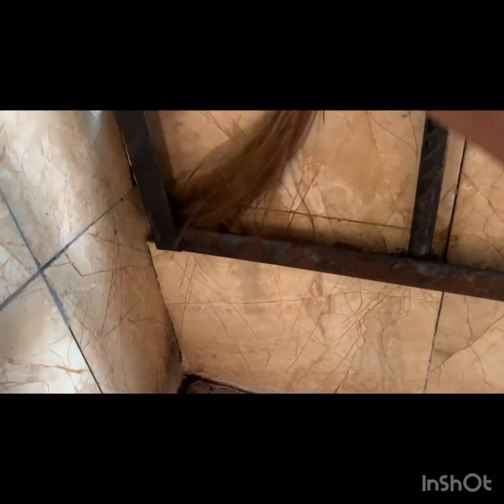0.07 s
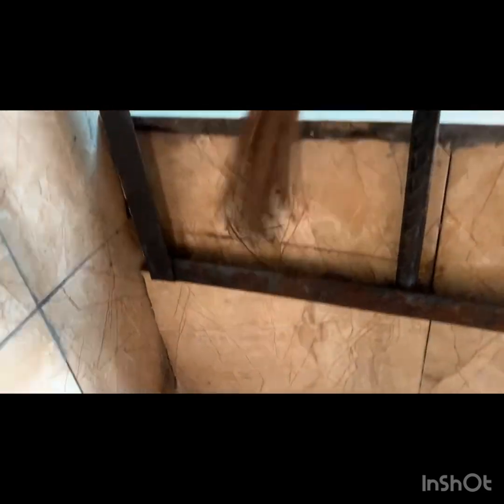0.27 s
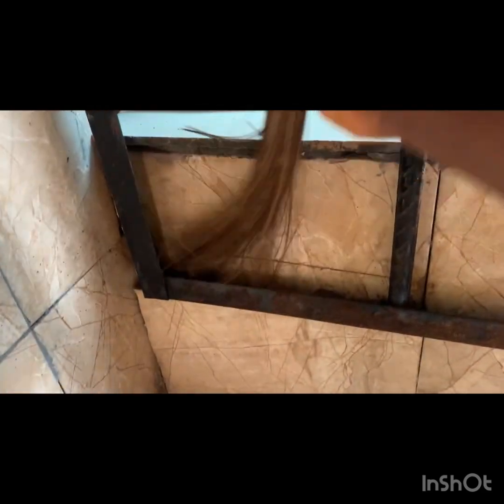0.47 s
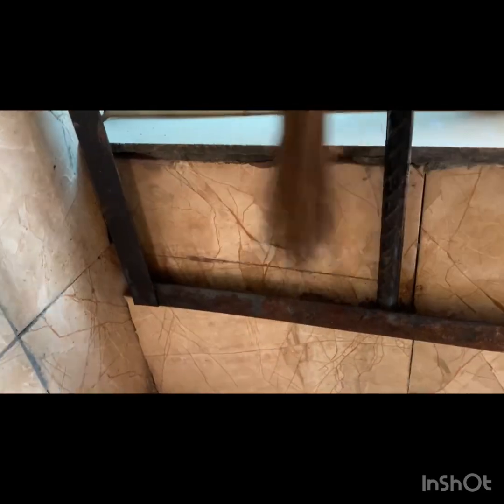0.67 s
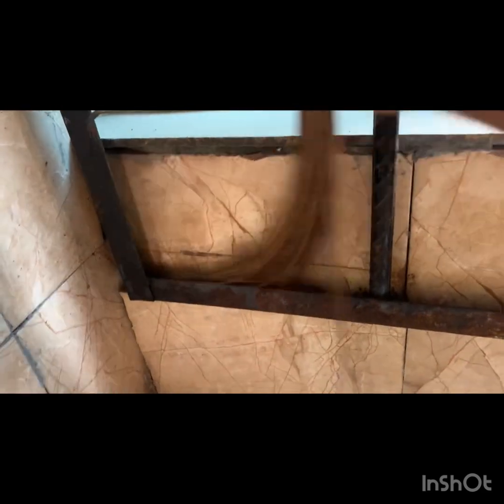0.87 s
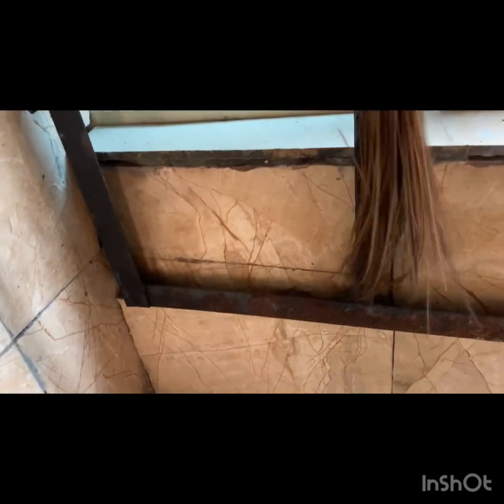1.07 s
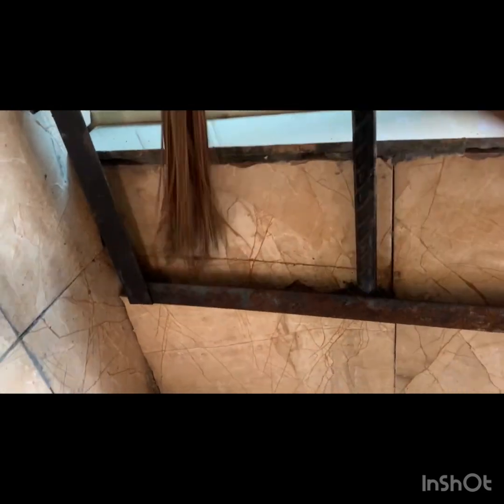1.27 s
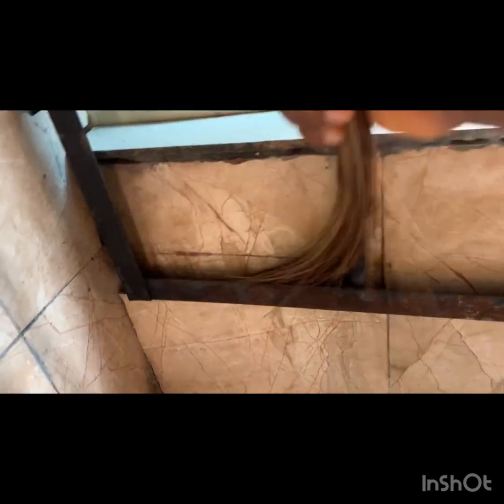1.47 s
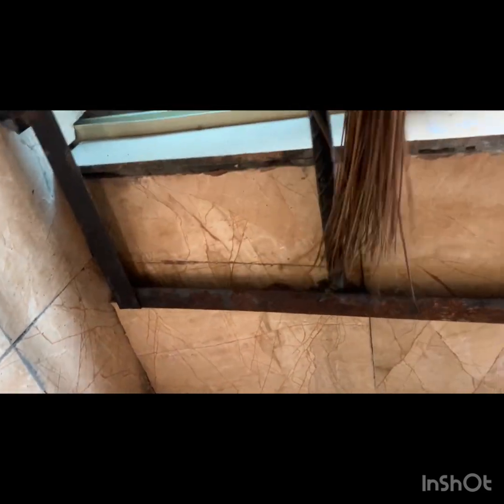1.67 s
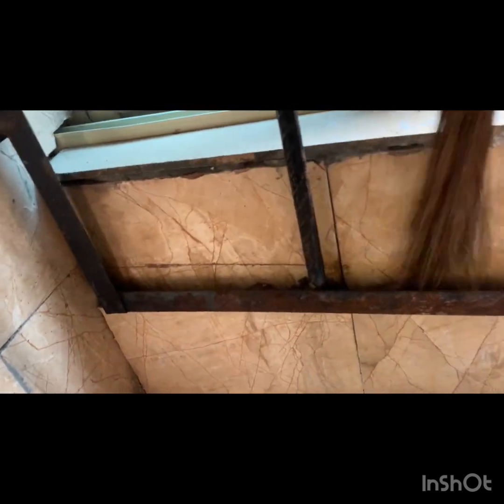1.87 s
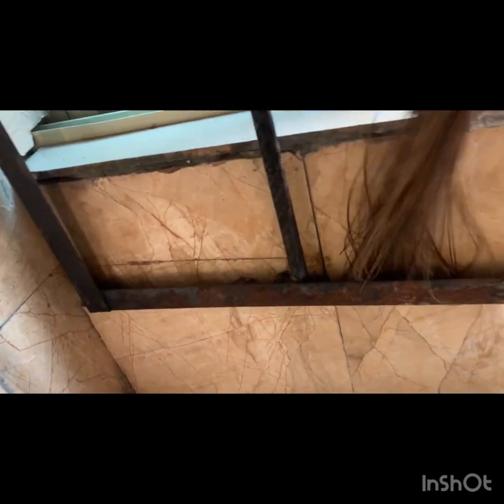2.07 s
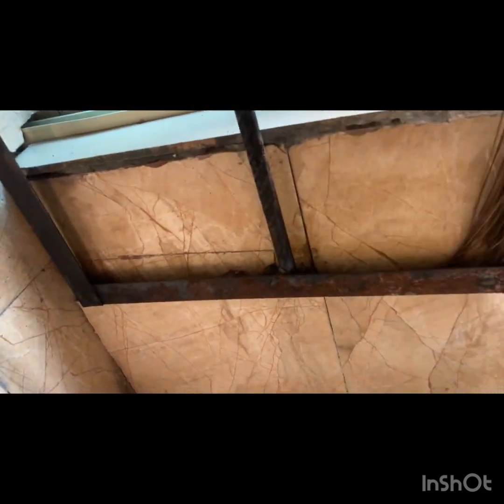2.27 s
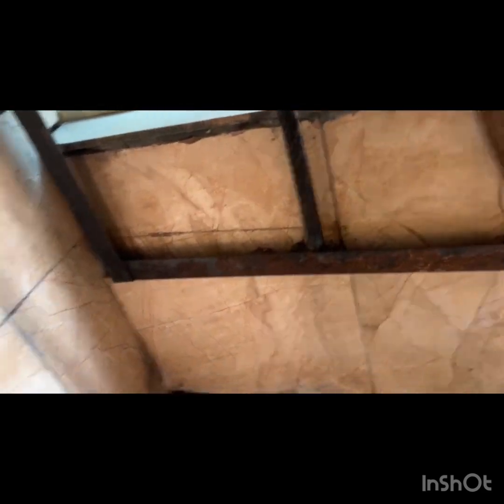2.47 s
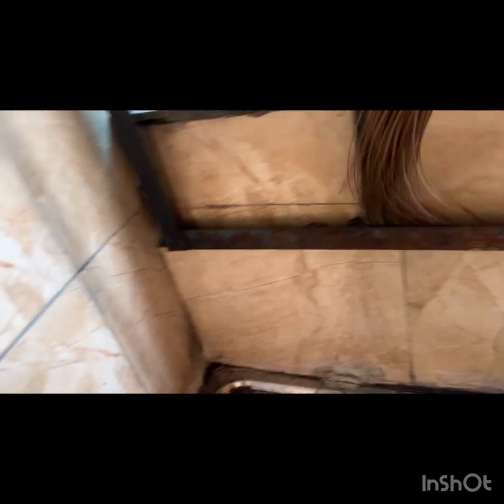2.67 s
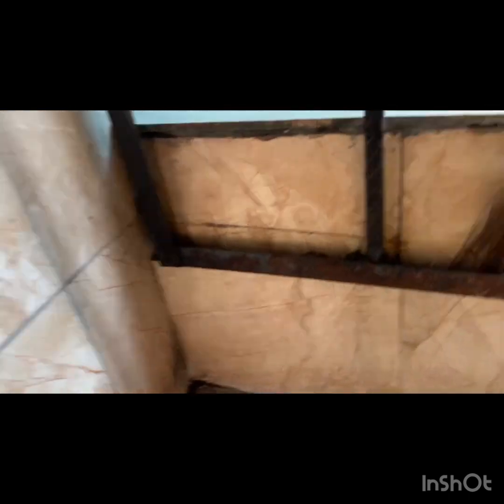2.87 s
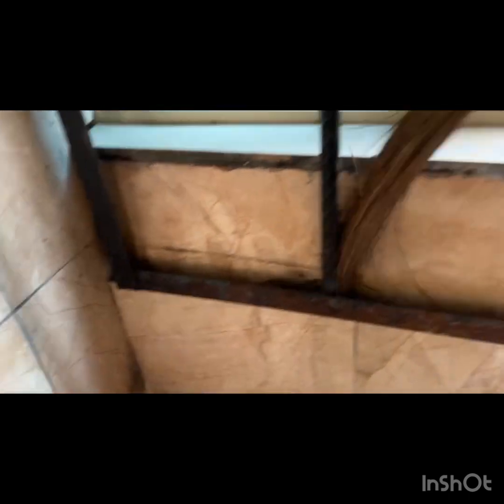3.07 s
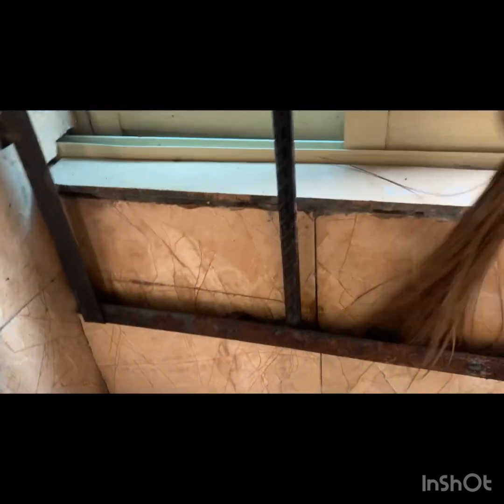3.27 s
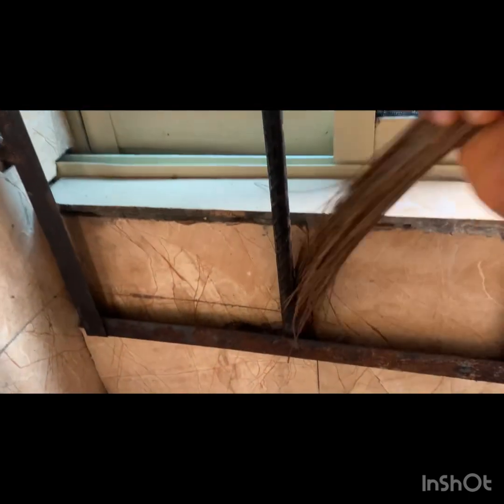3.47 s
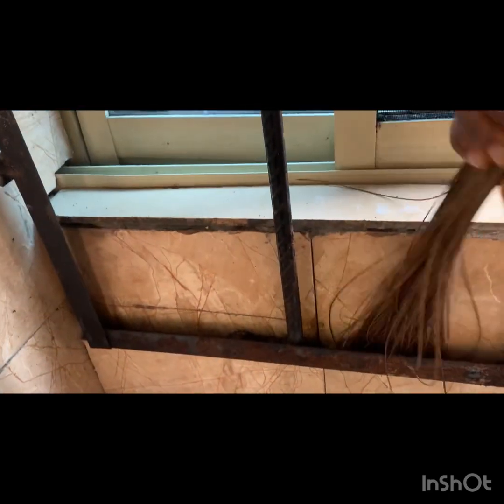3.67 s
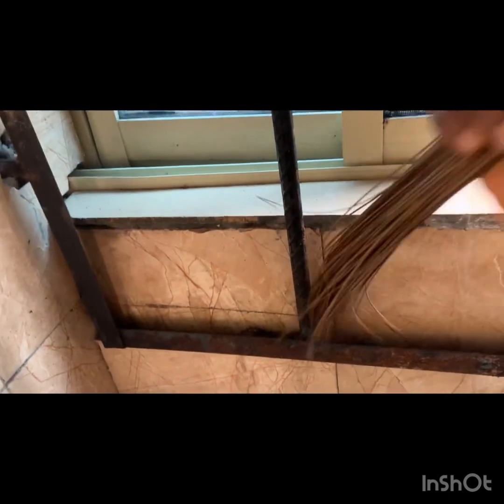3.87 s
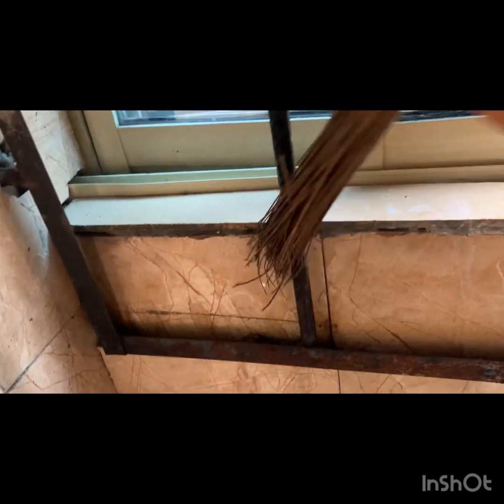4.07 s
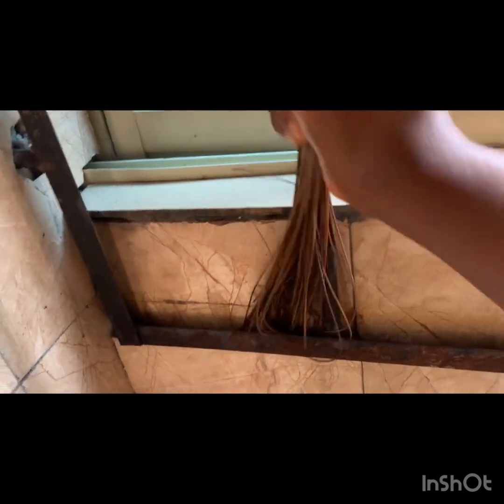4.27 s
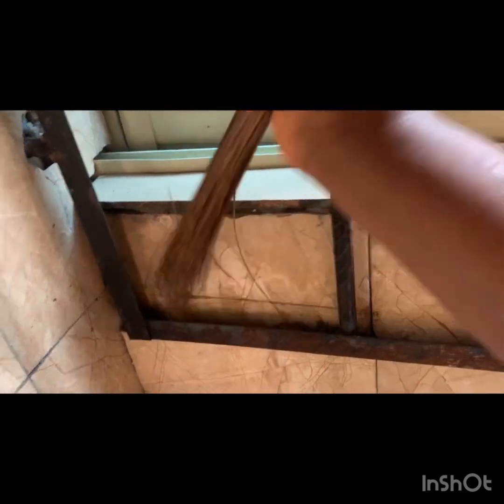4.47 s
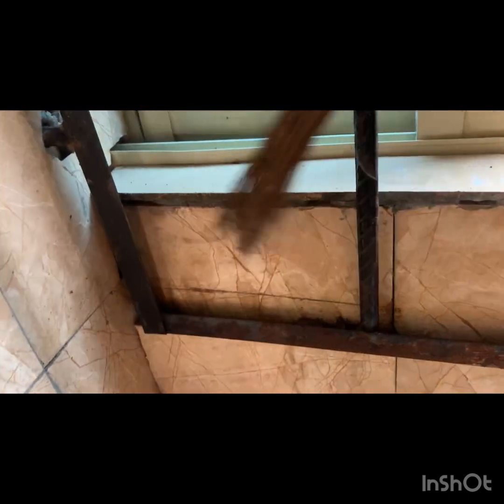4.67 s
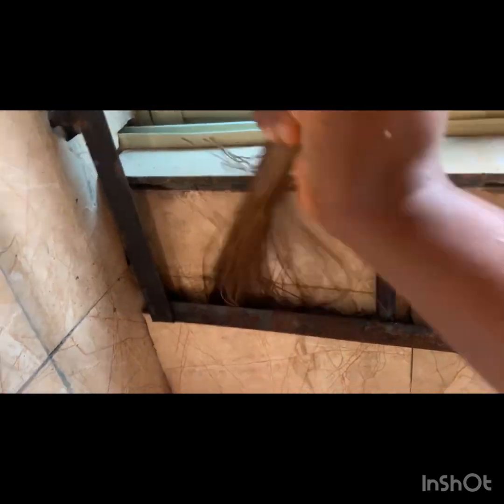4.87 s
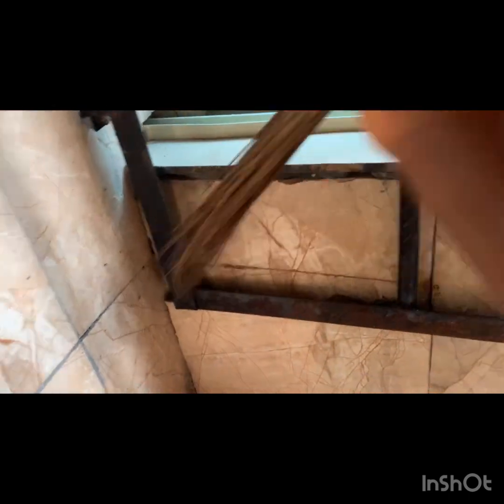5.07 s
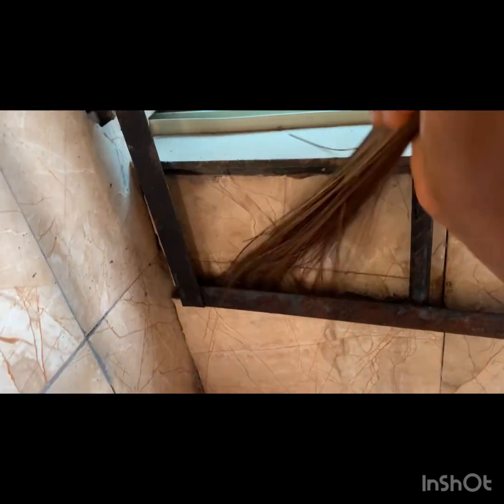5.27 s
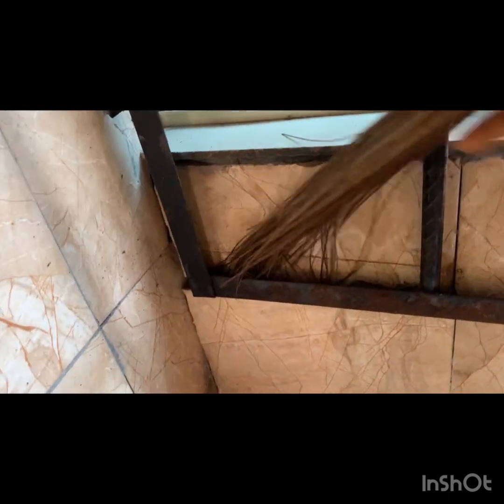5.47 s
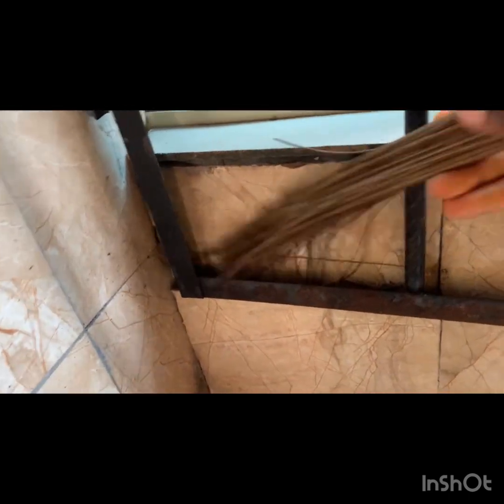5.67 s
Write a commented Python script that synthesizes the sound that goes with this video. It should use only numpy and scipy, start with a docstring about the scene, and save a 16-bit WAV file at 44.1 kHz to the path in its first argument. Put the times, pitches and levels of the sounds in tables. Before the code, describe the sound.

Dry bristles swish and scratch several times a second, strong at first, thinner around two seconds, then busy again with a hard clack just before three. Later strokes are shorter and softer, with clusters of ticks and bumps. Iron bars briefly ring, the ledge thuds dully, and a faint low beating hum lingers. Close stereo pickup with short tiled-room reflections and still air.

```python
"""Grass broom on a tiled window ledge

A small hard-walled kitchen; a soft grass broom works in quick strokes, to the right and close to a two-port
microphone. Bursts of random catches make the fibres hiss and scrape; noise bursts slap, dry clicks tick,
and resonant modes ring the bars, knock the ledge and hum in the window grille, two of them close enough
to beat. Fading noise tails answer from the recess and the room, over still air."""
import sys
import numpy as np
from scipy import signal
from scipy.fft import rfft, irfft, next_fast_len
from scipy.io import wavfile
from scipy.ndimage import uniform_filter1d, map_coordinates

SR = 44100
rng = np.random.default_rng(int(sys.argv[2]) if len(sys.argv) > 2 else 0)


def to_wav(s):
    """Save 16-bit WAV."""
    ch = np.atleast_2d(s).T  # columns
    pcm = np.round(np.clip(ch, -1, 1) * 32767)  # PCM
    wavfile.write(sys.argv[1], SR, pcm.astype(np.int16))


N = 251811
TIME = np.arange(N) / SR


def amp(db):
    """Decibels to gain."""
    return 10 ** (np.asarray(db) / 20)


def unit(x):
    """Scale to rms 1."""
    return x / np.sqrt(np.mean(x ** 2) + 1e-20)


def along(points, hz):
    """Read (f/Hz, value) points on a log frequency axis."""
    f, values = np.transpose(points)
    return np.interp(np.log(hz + 1), np.log(f + 1), values)


def filtered(x, response):
    """Filter x by a complex response of frequency."""
    n = x.shape[-1]
    padded_n = next_fast_len(n + SR // 2)
    spectrum = rfft(x, padded_n) * response(np.fft.rfftfreq(padded_n, 1 / SR))
    return irfft(spectrum, padded_n)[..., :n]


def coloured(x, spectrum):
    """Shape x by a (f/Hz, level/dB) spectrum, at rms 1."""
    return unit(filtered(x, lambda hz: amp(along(spectrum, hz))))


def wobble(rate):
    """A smooth random curve, rate knots a second."""
    return map_coordinates(rng.standard_normal(8192), [TIME * rate], mode="wrap")


def add(track, s, sound):
    """Mix a sound into a track at time s, or at the start if s is negative."""
    part = track[max(round(s * SR), 0):][:len(sound)]
    part += sound[:len(part)]


def focus(hz, centre_hz, octaves):
    """A bell-shaped gain around a centre frequency."""
    return np.exp(-.5 * (np.log2((hz + 1) / centre_hz) / octaves) ** 2)


def resonances(modes, f):
    """Response of a body with (f/Hz, width/Hz, level/dB) modes of alternating sign."""
    total = 0
    for k, (centre, width, db) in enumerate(modes):
        mode = 1j * f * width / (centre * centre - f * f + 1j * f * width)
        total = total + (-1) ** k * amp(db) * mode
    return total


def struck(modes, force, centre_hz, octaves):
    """A body's ring at peak 1; the contact picks out the modes around a centre frequency."""
    lead_in = 128  # samples of quiet before the force
    response = lambda f: resonances(modes, f) * focus(f, centre_hz, octaves)
    ring = filtered(np.pad(force, (lead_in, 0)), response)
    return ring / np.abs(ring).max()


def diffuse(size, alike_hz=550):
    """Noise from all sides: long waves are alike at both ports, short ones unrelated."""
    mid, side = rng.standard_normal((2, size))
    apart = lambda hz: 1 - np.exp(-(hz / alike_hz) ** 2) * .98
    mid = filtered(mid, lambda hz: np.sqrt(2 - apart(hz)))
    side = filtered(side, lambda hz: np.sqrt(apart(hz)))
    return np.array([mid + side, mid - side]) / 2


# bumps that set the grille humming: (t/s, level/dB, lean towards the 1st, 3rd and 5th mode/dB)
BUMPS = [(-.145, -40, 11), (.762, -48.5, 10), (0.995, -32, 9), (2.168, -39, 8.5), (3.319, -59, 16),
         (4.361, -53.5, 7), (4.762, -54.5, 10.5), (5.411, -43, 6)]
# modes of the iron window grille: (f/Hz, level/dB, t60/s)
GRILLE_MODES = [(103.15, -7, 4.5), (108.25, 8.5, 5.3), (145.4, -34, 11), (175.4, -8.5, 2), (215, -25, 1.47)]
# random waver of the hum: depth in dB, knots a second
HUM_WAVER_DB, HUM_WAVERS_PER_S = .8, 18


def grille(touch=0.24, swell=0.051):
    """Two close bar modes swing in opposition and beat; each new bump builds up and damps the ring before it."""
    track = np.zeros(N)
    ends = [row[0] for row in BUMPS[1:]] + [TIME[-1] + 1]
    for (s, db, lean_db), end in zip(BUMPS, ends):
        t = TIME - s
        ring = np.zeros(N)
        for k, (hz, level, t60) in enumerate(GRILLE_MODES):
            sign = (-1) ** k
            fade = amp(level + sign * lean_db - 60 * np.abs(t) / t60)
            ring += sign * fade * np.sin(2 * np.pi * hz * t)
        build_up = np.clip(1 + t / swell, 0, 1)  # swells in the moment before s
        damping = np.clip(.5 + (end - TIME) / touch, 0, 1)
        track += amp(db) * ring * build_up * damping
    return track * amp(HUM_WAVER_DB * wobble(HUM_WAVERS_PER_S))


def catches(rate, spread_db, life):
    """Fibres catching on grit and letting go: tiny bursts of uneven size at random moments."""
    sizes = amp(spread_db * np.clip(rng.standard_normal(N), -2, 1.8))
    hits = (rng.random(N) < rate / SR) * sizes
    energy = signal.lfilter([1], [1, -np.exp(-1 / (life * SR))], hits ** 2)
    return unit(np.sqrt(energy) * rng.standard_normal(N))


def friction(spectrum, grains, grit):
    """Countless soft contacts blur into a rush; the share grit stays single catches."""
    grit = np.clip(grit, 0, 1)
    rush = rng.standard_normal(N)
    return coloured(np.sqrt(grit) * grains + np.sqrt(1 - grit) * rush, spectrum)


def shifting(x, depth_db):
    """Ever new stalks touch the tile, each with its own resonances: the colour keeps changing."""
    z = signal.stft(x, nperseg=256)[2]
    field = uniform_filter1d(rng.standard_normal(z.shape), 4, axis=0)  # smooth over frequency
    field = uniform_filter1d(field, 9, axis=1)  # then over time
    return unit(signal.istft(z * amp(depth_db * unit(field)), nperseg=256)[1][:N])


# broom strokes: (t/s, rise/s, hold/s, level/dB, then relative to that level: pressure on the stalks/dB,
# rub on the ledge/dB, ring of the bars/dB; rasp f/Hz)
STROKES = [ (-.052, 0.037, 0.01, -26.5, 1, -17, -15.5, 2620), (.045, 0.06, 0.08, -31, -1.5, -19, -33, 2440),
           (.207, 0.13, 0.023, -43.5, -4.5, -19, -32, 3500), (.335, 0.045, 0.0074, -30, -1, -20, -12, 2660),
           (.42, 0.099, 0.042, -29, -1.5, -30.5, -41, 3900),
           (.64, 0.04, .015, -46.5, -13, -11.5, -34, 3500), (0.737, 0.05, 0.0072, -27.5, 3, -16, -16, 2370),
           (.813, 0.056, 0.062, -32.5, -1, -21, -12.5, 3480),
           (.893, 0.11, 0.084, -34, -0.5, -19, -27, 3600), (1.083, 0.064, 0.011, -43, -7, -18, -35, 4200),
           (1.17, 0.012, 0.028, -39, -6, -25, -34, 4270), (1.231, 0.024, 0.055, -37, -1, -19, -31, 3340),
           (1.284, 0.016, 0.023, -26, -1, -20, -17, 2550), (1.351, 0.042, 0.022, -31, 0, -17, -37, 3600),
           (1.441, 0.0073, 0.16, -31, -2.5, -24, -37, 4000), (1.6, 0.024, 0.054, -47, -18, -13, -34, 4020),
           (1.775, 0.011, 0.077, -44, 1, -10, -27, 3520),
           (1.858, 0.037, 0.047, -35.5, 1.5, -15.5, -12, 3070),
           (1.968, 0.015, .021, -39.5, -2, -14.5, -13, 2970), (2.046, .11, 0.017, -33.5, 0, -32, -18, 2980),
           (2.18, 0.063, 0.035, -43.5, -3, -14.5, -29, 3200),
           (2.343, 0.034, 0.013, -42.5, 1.5, -13.5, -15, 2570),
           (2.444, 0.016, 0.05, -44.5, 1, -18.5, -25, 3340),
           (2.517, 0.036, 0.009, -31.5, -4, -28, -10.5, 2880),
           (2.59, 0.054, 0.0093, -30.5, -1.5, -26, -10.5, 3280),
           (2.654, 0.02, 0.04, -35, -3, -21, -30, 3300), (2.713, 0.13, 0.0074, -38, -2.5, -18, -19, 2780),
           (2.87, 0.031, 0.0077, -32.5, 2.5, -17, -19, 3250),
           (2.963, 0.0044, 0.046, -32.5, -2, -11, -24, 3180),
           (3.026, 0.025, 0.0055, -30, -4.5, -15.5, -28, 3000),
           (3.064, 0.037, 0.066, -47, -2, -10, -30, 2600),
           (3.189, 0.093, 0.012, -35.5, 1.5, -19, -30, 2870),
           (3.332, 0.016, .004, -35.5, -1, -21, -18, 3170),
           (3.375, 0.02, 0.0033, -29.5, -0.5, -25, -24, 2970),
           (3.41, 0.052, .12, -47, -2.5, -15, -29, 3200),
           (3.584, 0.053, 0.014, -37.5, 2.5, -18.5, -21, 3220),
           (3.695, 0.019, 0.075, -38, 0, -17, -12.5, 3200), (3.813, 0.028, 0.019, -38, 0, -33, -26, 3480),
           (3.846, 0.042, 0.034, -35.5, -1.5, -21.5, -25, 3480),
           (4.085, 0.008, 0.078, -53, -9, -1, -31, 4200), (4.151, 0.067, 0.0057, -34.5, 0, -10, -26, 4380),
           (4.266, 0.006, 0.018, -37.5, -3.5, -7, -27, 3800),
           (4.301, 0.064, 0.0067, -40.5, -5.5, -14, -36, 4200),
           (4.402, 0.0086, .006, -38, -3, -18, -25, 4200),
           (4.411, 0.023, 0.017, -31.5, -4.5, -21, -29, 4440),
           (4.461, 0.044, 0.006, -39, -2, -25, -13, 3200), (4.664, 0.021, .004, -49.5, -4, -22, -30, 3500),
           (4.69, 0.0097, 0.053, -40, 0, -11, -35, 3800), (4.716, .06, 0.011, -30.5, -1, -18.5, -32, 2600),
           (4.843, 0.012, 0.022, -44, 0, -9, -24, 3400), (4.875, 0.02, 0.032, -38, -1.5, -15, -25, 3200),
           (4.899, 0.042, 0.018, -33, -3, -22, -17, 2470), (4.975, 0.051, 0.039, -38, .5, -20, -12, 2300),
           (5.14, 0.065, 0.031, -46.5, -2, -26, -32, 3060),
           (5.23, 0.037, 0.006, -31.5, 3.5, -22, -23, 2600),
           (5.392, 0.012, 0.18, -49.5, 0.5, -15.5, -13, 2800),
           (5.625, 0.094, .02, -39, 1.5, -26, -21, 2800)]
# a stroke swells as the fibres bend, sags while they drag and dies away as they lift off
SWELL_POWER, SAG_DB_PER_S, LIFT_DB_PER_S = 1.125, 37, 269


def effort(levels_db):
    """Gain over time of all strokes, given a level for each: swell, sagging hold, lift-off."""
    power = np.zeros(N)
    t = np.arange(int(.7 * SR)) / SR
    for (start, rise, hold, *_), db in zip(STROKES, levels_db):
        age = t + max(-start, 0)  # a stroke may already be under way at the start
        rise = max(rise, .004)
        sag_db = SAG_DB_PER_S * np.maximum(age - rise, 0)
        lift_db = LIFT_DB_PER_S * np.maximum(age - rise - hold, 0)
        swell = np.minimum(age / rise, 1) ** SWELL_POWER
        add(power, start, (swell * amp(db - sag_db - lift_db)) ** 2)
    return np.sqrt(power)


def rasp(scrape, levels_db, centres_hz, octaves=0.25):
    """The free length of the stalks differs from stroke to stroke, and with it the pitch at which they rasp."""
    total = np.zeros(N)
    for hz in 1800 * 2 ** (np.arange(6) * .3):
        band = filtered(scrape, lambda f: .8 * focus(f, hz, .15))
        share_db = 20 * np.log10(focus(hz, centres_hz, octaves) + 1e-6)
        total += band * effort(levels_db + share_db)
    return total


# straws flicking free: how many a second, level against the stroke in dB
FLICKS_PER_S, FLICK_DB = 320, -7.5


def flicks(low_hz=3000, high_hz=15000, cycles=2.3, spread_db=8):
    """Single straws spring free, each with a dry click at the pitch of its own length."""
    when, length, size = rng.random((int(FLICKS_PER_S * N / SR), 3)).T[:, :, None]
    t = np.arange(SR // 100) / SR
    hz = low_hz + (high_hz - low_hz) * length
    clicks = amp(spread_db * size) * hz * np.sin(2 * np.pi * hz * t) * np.exp(-t * hz / cycles)
    places = (when * N).astype(int) + np.arange(len(t))
    return unit(np.bincount(places.ravel(), clicks.ravel(), N)[:N])


# high modes of an iron bar, its thin ring: (f/Hz, width/Hz, level/dB)
BAR_MODES = [(1420, 19, -18), (1540, 7, -36), (2148, 21, 2.5), (2328, 52, 10.5), (3180, 84, -8),
             (3580, 42, -5), (4040, 59, 1.5), (5300, 91, -14.5)]


def bar():
    """Stalks catching on an iron bar ring its high modes in fits; which ones shifts with the point of contact."""
    grains = catches(rate=200, spread_db=3, life=.0008)
    ring = np.zeros(N)
    for mode in BAR_MODES:
        fits_db = 2.5 * wobble(5) + 2.5 * wobble(35)
        ring += filtered(grains, lambda f: resonances([mode], f)) * amp(fits_db)
    return unit(ring)


# colour of the hissing tips: (f/Hz, level/dB)
TIPS_COLOUR = [(2500, -33), (5000, -8), (7500, -6), (9500, 2.5), (12000, 4), (14500, 0), (15600, -1.5)]
# colour of the scraping stalks: (f/Hz, level/dB)
STALKS_COLOUR = [(300, -61), (900, -15), (1850, .5), (2200, 6), (2700, 4.5), (3200, 4), (4300, 2),
                 (5500, 0.5), (7500, -14), (11000, -66)]
# colour of the murmuring ledge: (f/Hz, level/dB)
RUB_COLOUR = [(40, -23), (150, 2), (300, -6.5), (520, -0.5), (700, -7.5), (1100, -2.5), (1500, -8.5),
              (2200, -14), (4000, -18)]
# tip hiss against the stroke; loose fibres rustling throughout (dB)
HISS_DB, RUSTLE_DB = 0, -66
# scrape against the stroke; coarse rasp against the scrape, and its extra dB per dB of pressure
STALK_DB, COARSE_DB, COARSE_GROWS = -10.5, -5.5, 1


def sweeping(tips_jerk_db=0.58, stalks_jerk_db=-1.0, rub_jerk_db=0.5):
    """Tips hiss, stalks scrape and ring the bars, the ledge murmurs under them; the tufts drag in small jerks."""
    level, pressure, on_ledge, on_bars, rasp_hz = np.transpose(STROKES)[3:]
    jerks = wobble(130)
    fine = catches(rate=1100, spread_db=3.5, life=.00025)
    coarse = catches(rate=360, spread_db=3.5, life=.0003)
    ticks = catches(rate=130, spread_db=2.5, life=.0004)
    # single straws tick through the hiss, the scrape and the rub
    hiss = shifting(friction(TIPS_COLOUR, fine + .3 * ticks, grit=.55), depth_db=1.5)
    scrape = shifting(friction(STALKS_COLOUR, coarse + .45 * ticks, grit=.85), depth_db=1.7)
    murmur = friction(RUB_COLOUR, coarse + 0.27 * ticks, grit=0.45)
    # pressing harder brings the thick stalks down, which rasp at a pitch of their own
    stalk_db = level + STALK_DB + pressure
    thick = rasp(scrape, stalk_db + COARSE_DB + COARSE_GROWS * pressure, rasp_hz)
    tips = effort(level) * (amp(HISS_DB) * hiss + amp(FLICK_DB) * flicks())
    stalks = thick + effort(stalk_db) * scrape + effort(level + on_bars) * bar()
    rub = effort(level + on_ledge) * murmur
    rustle = amp(RUSTLE_DB) * (hiss + 0.21 * scrape)
    # the stalks weaken whenever a jerk favours the tips
    jerky = tips * amp(tips_jerk_db * jerks) + stalks * amp(stalks_jerk_db * jerks)
    return jerky + rub * amp(rub_jerk_db * jerks) + rustle


# knocks of the broom head: (t/s, peak level/dB, centre f/Hz, spread/octaves, drag level/dB, drag t60/s)
KNOCKS = [(.003, -35.5, 355, 0.77, -18, 0.12), (.638, -44, 376, 0.35, -22, 0.1),
          (.666, -35, 236, 0.24, -14, 0.65), (.792, -42, 190, 0.55, -9, .85),
          (0.92, -40, 56.5, 0.43, -14, 0.035), (.935, -38.5, 173, 0.055, -24, .7),
          (1.011, -43, 222, 0.13, -15, 0.72), (1.255, -44, 308, 0.32, -22, .096),
          (1.294, -45.5, 520, 0.11, -8, 0.55), (1.864, -31.5, 365, 0.45, -23, 0.47),
          (1.871, -39, 160, 0.29, -14, 0.59), (2.151, -48, 184, 0.62, -1, 1),
          (2.235, -45, 177, .12, -16, 0.96), (2.901, -44.5, 422, 0.56, 3, 0.37),
          (2.963, -32, 564, 0.74, -16, 0.23), (2.976, -34, 298, 0.55, -30, 0.24),
          (2.9643, -34, 1400, 0.61, 6, 0.23), (3.34, -46.5, 310, 0.45, -13, 0.4),
          (3.45, -45, 330, 0.27, -7, 0.21), (4.1, -50, 282, 0.12, 4, 0.22),
          (4.276, -42, 1100, 0.48, -12, 0.06), (4.264, -42.5, 200, 0.64, -13, 0.6),
          (4.695, -48, 900, 0.95, -17, 0.028), (4.742, -42.5, 560, 0.58, -14.5, 0.17),
          (4.796, -41, 600, 0.73, -5, 0.16), (4.903, -46, 249, 0.16, -10.5, 0.55),
          (5.249, -48, 290, 0.47, -14, 0.33)]
# modes of the ledge and window frame: (f/Hz, width/Hz, level/dB)
LEDGE_MODES = [(52, 25, -6), (145, 10, -1), (174, 8, 4), (212, 20, -1), (258, 20, -11), (304, 14, 4),
               (382, 14, -11), (425, 13, 4.5), (511, 14, -2), (532, 14, -1.5), (738, 35, -8),
               (1060, 130, -12), (1352, 30, -2), (1486, 30, -4)]


def knocks(blow=0.025):
    """The soft head lands on ledge and frame and drags briefly; a firmer contact reaches higher modes."""
    track, t = np.zeros(N), np.arange(SR // 2) / SR
    for s, db, centre_hz, octaves, drag_db, t60 in KNOCKS:
        landing = unit(np.exp(-t / blow * centre_hz / 100))  # shorter for higher centres
        drag = unit(rng.standard_normal(len(t)) * amp(-60 * t / t60)) * np.sqrt(SR / centre_hz)
        force = landing + amp(drag_db) * drag
        add(track, s, amp(db) * struck(LEDGE_MODES, force, centre_hz, octaves))
    return track


# single straws ticking against grit and edges: (t/s, peak level/dB)
TICKS = [(.2512, -34), (0.2672, -31), (.2855, -46), (0.3657, -26), (.5010, -26), (.692, -26.5),
         (0.7455, -24), (.763, -18), (.9574, -30), (1.1081, -26), (1.148, -37), (1.2682, -22),
         (1.4952, -36), (1.815, -29), (1.8577, -27), (1.958, -38), (1.998, -40), (2.0125, -37),
         (2.3133, -38), (2.3922, -36), (2.7615, -38), (2.874, -41), (2.9225, -18), (3.154, -41),
         (3.172, -37), (3.2013, -35), (3.719, -33), (3.8403, -23.5), (3.972, -35), (3.9817, -35),
         (4.0669, -45), (4.1916, -25), (4.2844, -22), (4.598, -36), (4.686, -44), (4.72, -24), (4.758, -33),
         (4.865, -30), (5.5135, -34), (5.635, -40)]


def straws(t60=.003, low_hz=4500, high_hz=12000, octaves=.7):
    """One straw lets go: a tiny dry tick, each with its own brightness."""
    track, t = np.zeros(N), np.arange(SR // 40) / SR
    for s, db in TICKS:
        centre_hz = low_hz + (high_hz - low_hz) * rng.random()
        tick = filtered(rng.standard_normal(len(t)), lambda f: focus(f, centre_hz, octaves))
        tick = tick * amp(-60 * t / t60)
        add(track, s, amp(db) * tick / np.abs(tick).max())
    return track


# tufts snapping against bars and tile: (t/s, level/dB, stalk clack against it/dB)
SLAPS = [(0.345, -33, -9), (0.486, -25, -19), (0.7335, -34, -12), (0.7592, -33.5, -13), (1.0348, -24, -26),
         (1.1743, -27.5, -22), (1.288, -24, -7), (1.29, -24, -14), (1.4509, -24, -16), (1.7800, -35, -13),
         (1.8637, -22, -8), (2.0517, -34, -8.5), (2.2943, -31, -10), (2.4452, -34, -9), (2.5274, -31, -17),
         (2.896, -28, -19), (2.9633, -12.5, -12.5), (2.9650, -16.5, -14), (3.351, -25, -24),
         (4.01, -41.5, -0.5), (4.093, -37.5, -7), (4.2605, -30, -1), (4.4102, -40, -10), (4.443, -28, -36),
         (4.5063, -33, -0.5), (4.6937, -23, -5), (4.802, -23.5, -7.5), (4.841, -28, -15),
         (4.8855, -25.5, -21), (5.236, -27.5, -21.5), (5.399, -44, -14)]
# colour of the clacking stalks: (f/Hz, level/dB)
CLACK_COLOUR = [(60, -45), (250, 7), (600, 11.5), (1300, 16.5), (2400, 22), (4500, 18.5), (8000, 13.5),
                (14000, -25)]
# fade of the fine tips and of the stiff stalks (s)
SNAP_T60_S, CLACK_T60_S = 0.013, 0.01


def slaps(landing=0.00033):
    """A bent tuft springs free and its fibres land within a millisecond or two."""
    track, t = np.zeros(N), np.arange(SR // 6) / SR
    onset = (1 - np.exp(-t / landing)) ** 2
    snap = onset * amp(-60 * t / SNAP_T60_S)
    clack = onset * amp(-60 * t / CLACK_T60_S)
    for s, db, clack_db in SLAPS:
        fibres, stalks = rng.standard_normal((2, len(t)))
        burst = snap / snap.max() * coloured(fibres, TIPS_COLOUR)
        burst += amp(clack_db) * clack / clack.max() * coloured(stalks, CLACK_COLOUR)
        add(track, s, amp(db) * burst)
    return track


# stalks catching on a bar so that it sings: (t/s, peak level/dB, favoured mode f/Hz)
PINGS = [(.779, -28, 2180), (.796, -35.5, 2230), (2.548, -41, 2260), (2.625, -46, 2345), (2.872, -37, 2360),
         (3.008, -26.5, 2304), (3.085, -46, 2360), (5.015, -40, 2140), (5.256, -36, 2210)]


def pings(scratch_t60=0.048, octaves=0.021):
    """A stiff stalk scratches across a bar, which sings on for a moment."""
    track, t = np.zeros(N), np.arange(SR // 4) / SR
    for s, db, hz in PINGS:
        scratch = rng.standard_normal(len(t)) * amp(-60 * t / scratch_t60)
        add(track, s, amp(db) * struck(BAR_MODES, scratch, hz, octaves))
    return track


# bound stalks bumping the ledge, short and dead: (t/s, level/dB, f/Hz)
TAPS = [(2.9628, -23, 2800), (2.9642, -35, 610), (4.2613, -26.5, 1170), (4.2645, -33, 387),
        (4.2955, -41, 227), (4.3058, -39, 260), (4.6935, -42, 915), (4.796, -37, 597)]


def taps(cycles=1.3):
    """The stiff neck of the broom bumps the tile: a push that dies within a few swings."""
    track, t = np.zeros(N), np.arange(SR // 20) / SR
    for s, db, hz in TAPS:
        add(track, s, amp(db) * np.sin(2 * np.pi * hz * t) * np.exp(-t * hz / cycles))
    return track


# how long the small hard kitchen rings: (f/Hz, t60/s)
ROOM_DECAY = [(150, .45), (1000, .34), (2300, .36), (5000, .27), (10000, .17), (16000, .12)]
# colour of its answer: (f/Hz, level/dB)
ROOM_ANSWER = [(100, -6), (500, 5), (1200, 6.5), (2300, 7), (3200, 6), (5500, 5.5), (7000, 3), (9000, -3),
               (15000, -7)]


def kitchen(x, recess_db=10, recess_t60=0.038, count=24):
    """The window recess answers at once, then the tiled room dies away; the echoes change as the broom moves."""
    wet, hop = np.zeros((2, N)), N // count
    padded = np.pad(x, (0, 3 * hop))
    for start in range(0, N, hop):  # a fresh noise tail for each stretch
        hz, t, z = signal.stft(diffuse(SR // 3), SR, nperseg=256)
        fade = amp(-60 * t / along(ROOM_DECAY, hz)[:, None]) + amp(recess_db - 60 * t / recess_t60)
        fade = fade / np.sqrt(np.sum(fade ** 2, axis=1, keepdims=True) * t[1] * SR)
        colour = amp(along(ROOM_ANSWER, hz))[:, None]
        tail = signal.istft(z * fade * colour, SR, nperseg=256)[1]
        echoes = signal.fftconvolve(padded[None, start:start + hop], tail, axes=1)
        for side, echo in zip(wet, echoes):
            add(side, start / SR + 0.00144, echo)
    return wet


# mean delay between the microphone ports (s); its random swing as a share, knots a second
PORT_LAG_S, SWING, SWINGS_PER_S = .00018, .035, 6


def ports(x):
    """The broom is off to the right, so its sound reaches the left port later, by a delay that shifts as it swings."""
    half = SR * PORT_LAG_S * (1 + SWING * wobble(SWINGS_PER_S)) / 2
    return np.array([map_coordinates(x, [np.arange(N) + side * half], order=5) for side in (-1, 1)])


# the rasp spreads through tile and bars, so less comes straight from the broom: (f/Hz, direct level/dB)
DIRECT_COLOUR = [(400, 0), (900, -3), (2500, -4.5), (4500, -1.5), (7500, 0)]
# colour of the still air: (f/Hz, level/dB)
AIR_COLOUR = [(20, -18), (55, 0), (110, 5), (200, -1), (400, -12), (1000, -18.5), (2500, -19), (6000, -13),
              (15000, -68)]
# kitchen's answer, still air (dB)
ROOM_DB, AIR_DB = -1, -57


def scene():
    """Broom, bars and ledge in the room, over the grille's hum and the still air."""
    hum = grille() * amp([[-.6], [.6]])  # dB, left and right port
    broom = sweeping() + slaps()
    clicks = straws()
    rings = knocks() + taps() + pings()
    room = kitchen(broom + amp(-4) * clicks + amp(-8) * rings)
    direct = filtered(broom, lambda hz: amp(along(DIRECT_COLOUR, hz))) + clicks + rings
    air = amp(AIR_DB) * coloured(diffuse(N), AIR_COLOUR)
    return ports(direct) + amp(ROOM_DB) * room + hum + air


TOP_HZ = 15750


def record(dry):
    """The recorder's steep band limit removes the sound above TOP_HZ."""
    return filtered(dry, lambda hz: 1 / np.sqrt(1 + (hz / TOP_HZ) ** 240))


dry = scene()
out = record(dry)
to_wav(out)
```